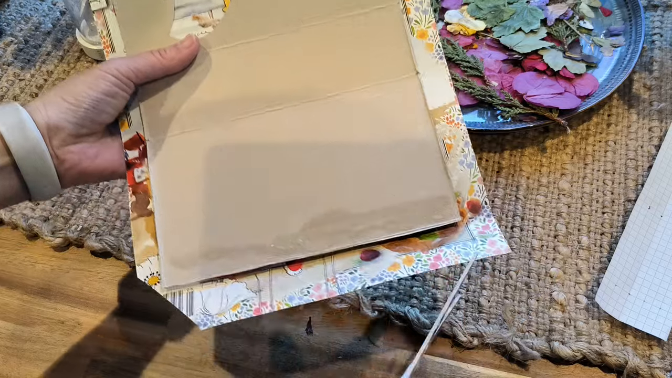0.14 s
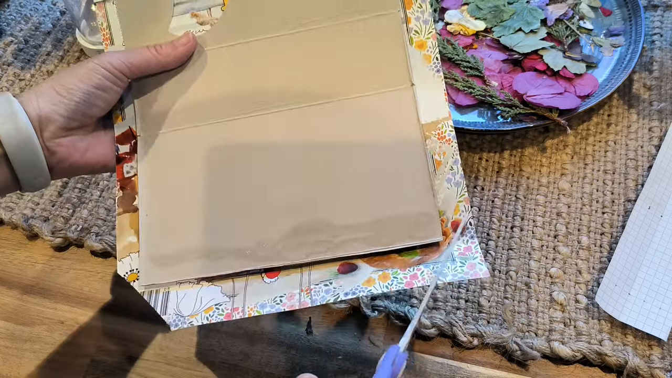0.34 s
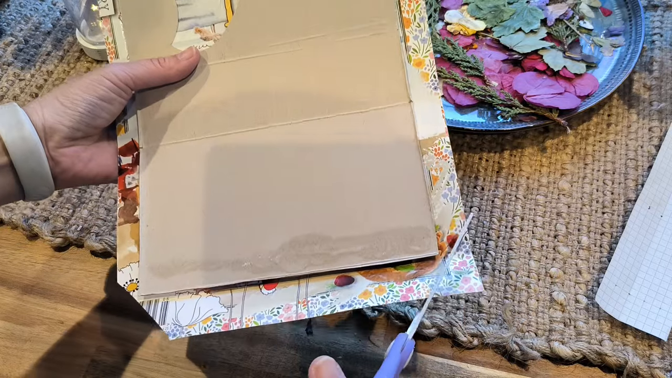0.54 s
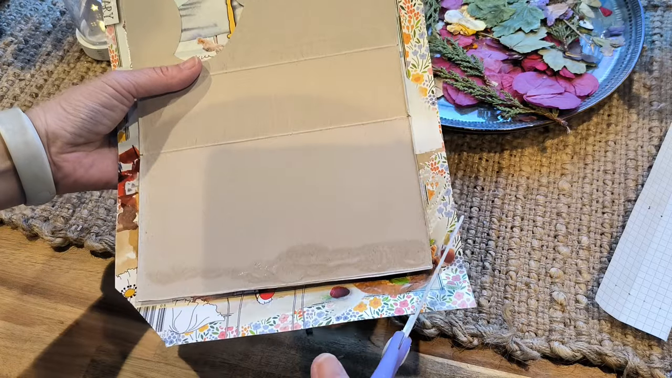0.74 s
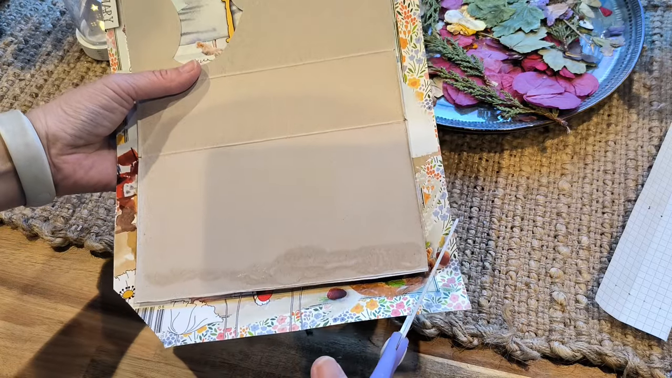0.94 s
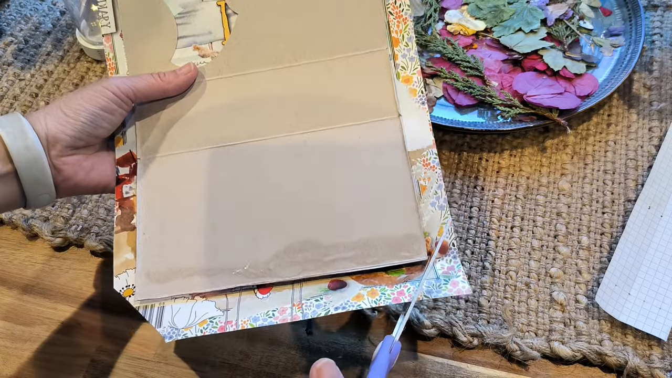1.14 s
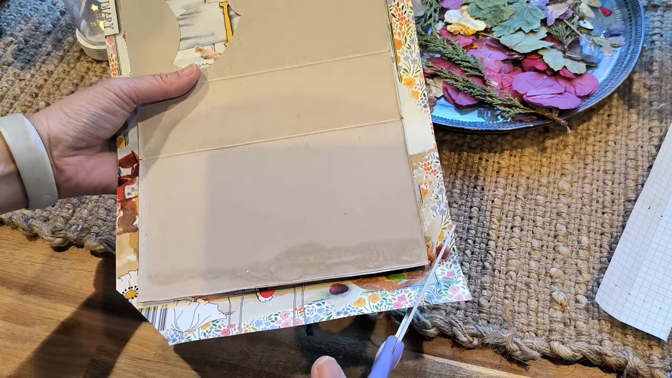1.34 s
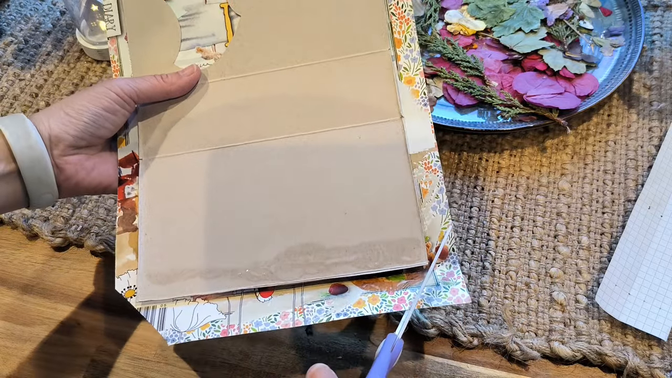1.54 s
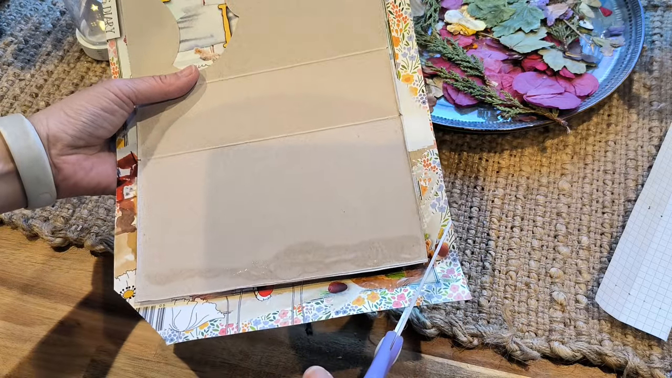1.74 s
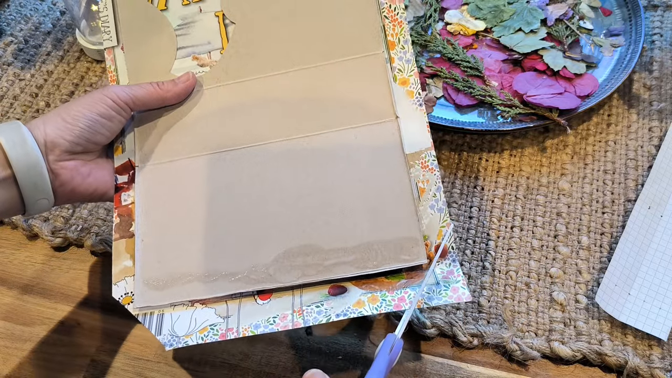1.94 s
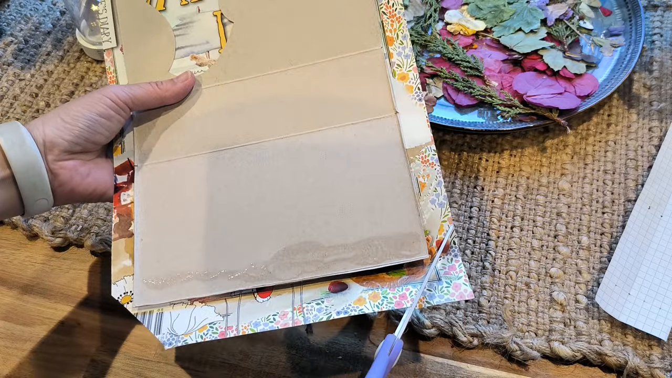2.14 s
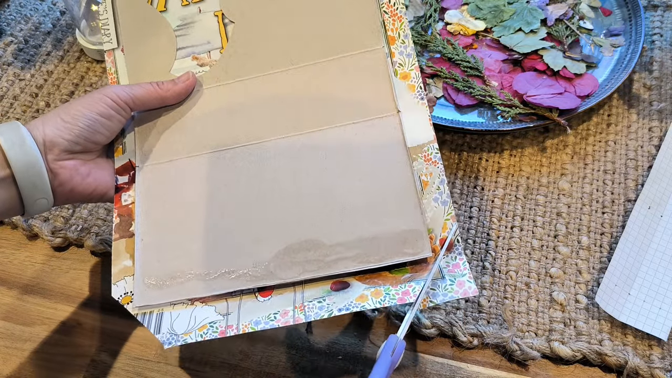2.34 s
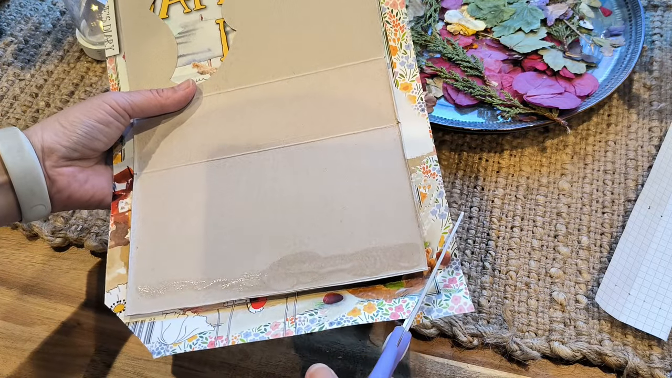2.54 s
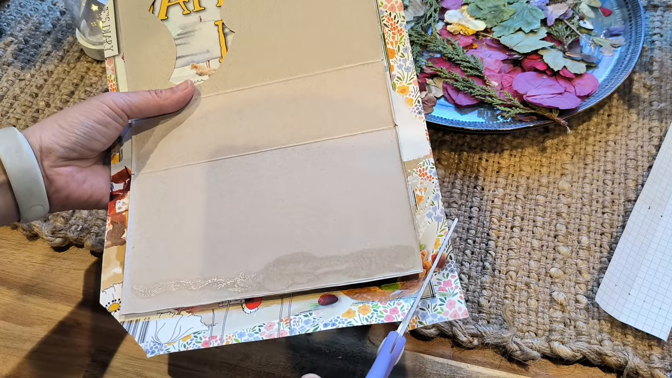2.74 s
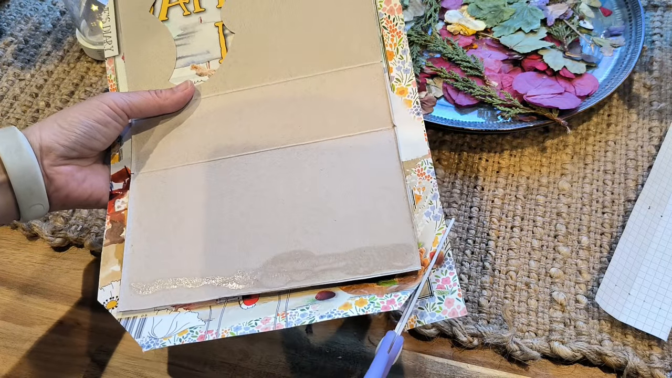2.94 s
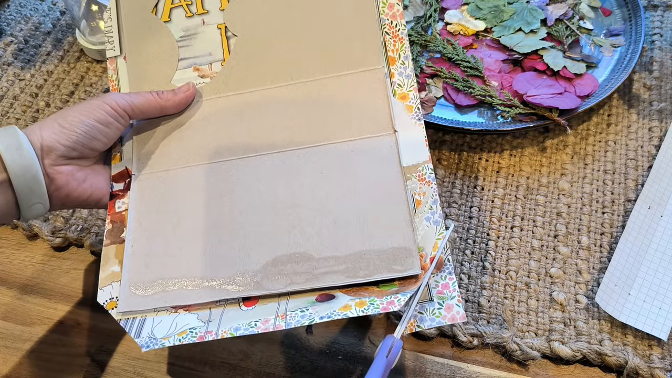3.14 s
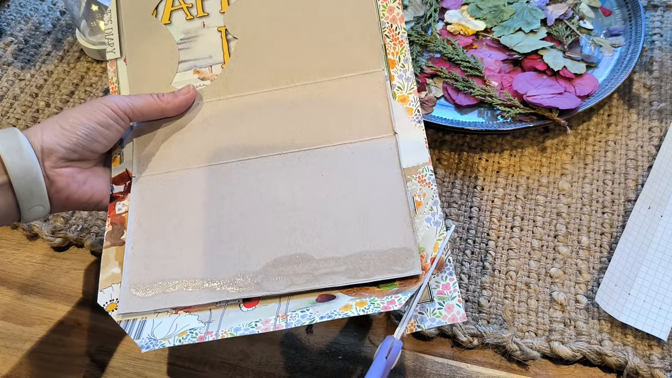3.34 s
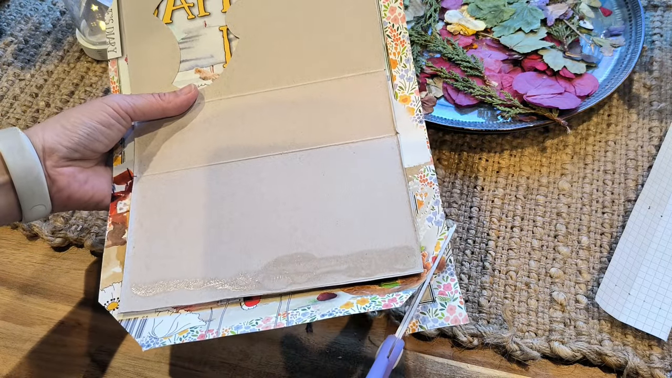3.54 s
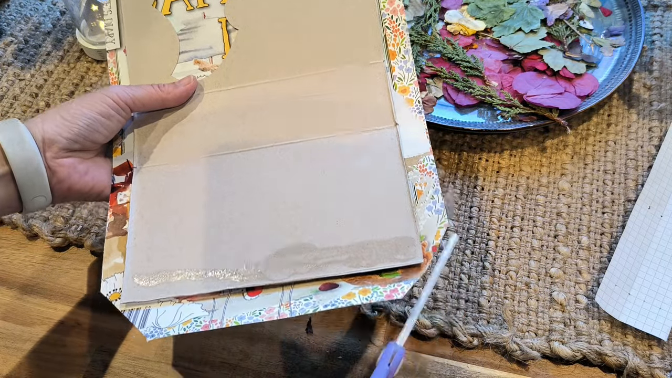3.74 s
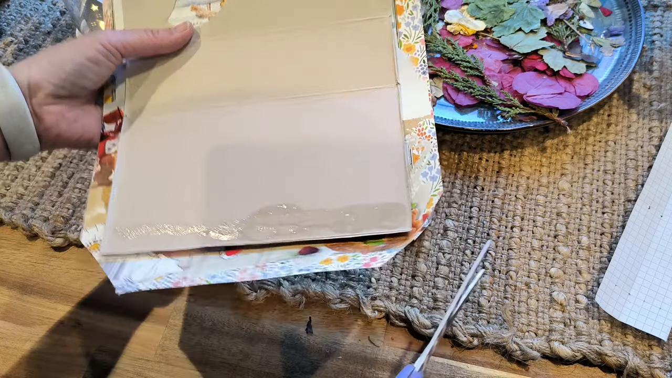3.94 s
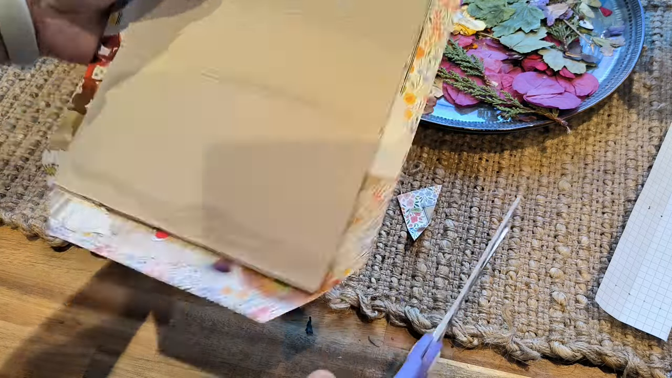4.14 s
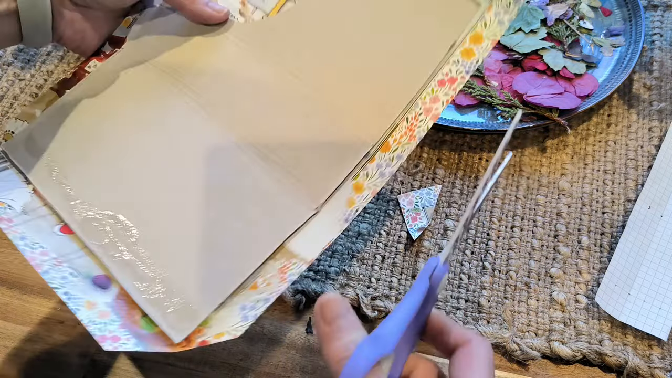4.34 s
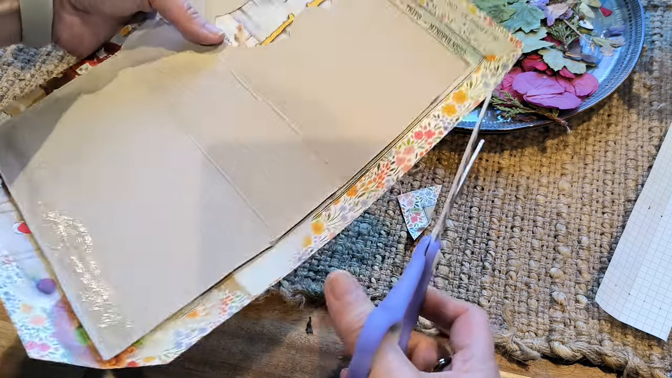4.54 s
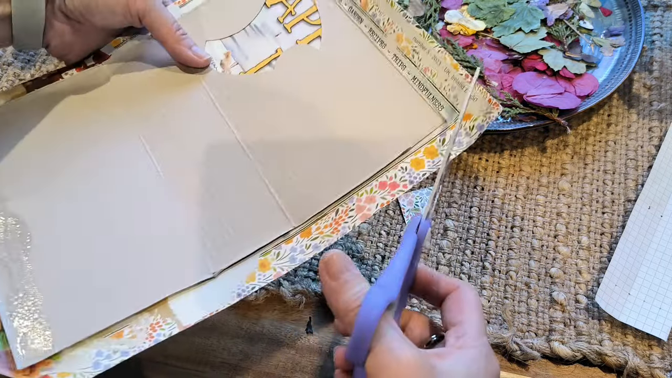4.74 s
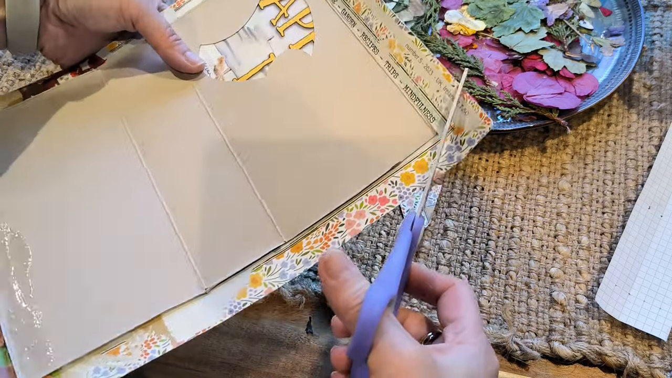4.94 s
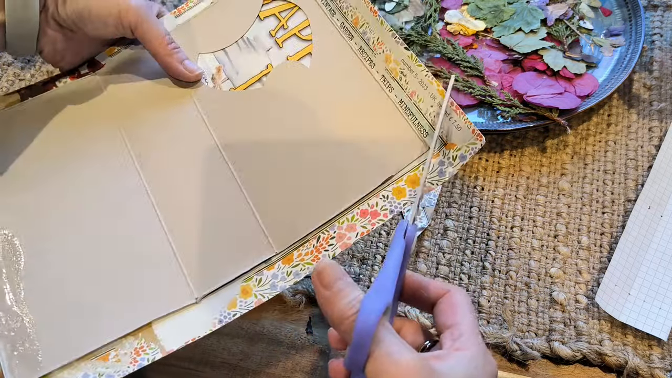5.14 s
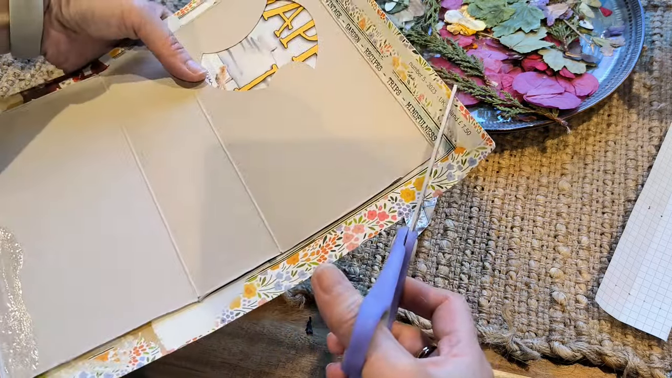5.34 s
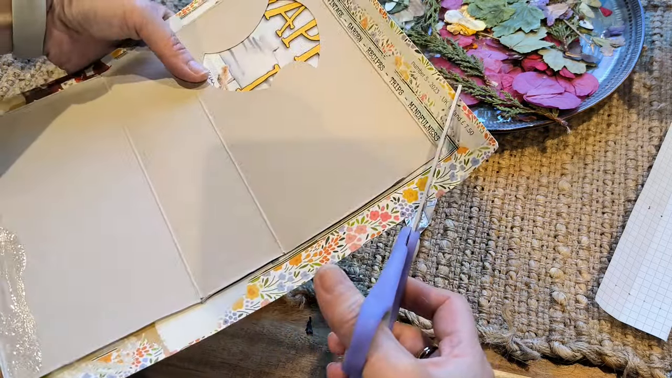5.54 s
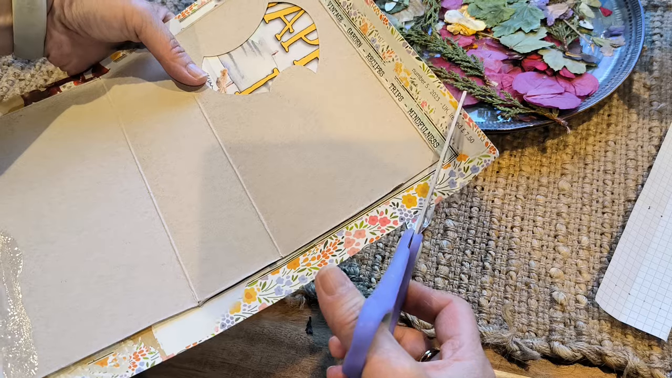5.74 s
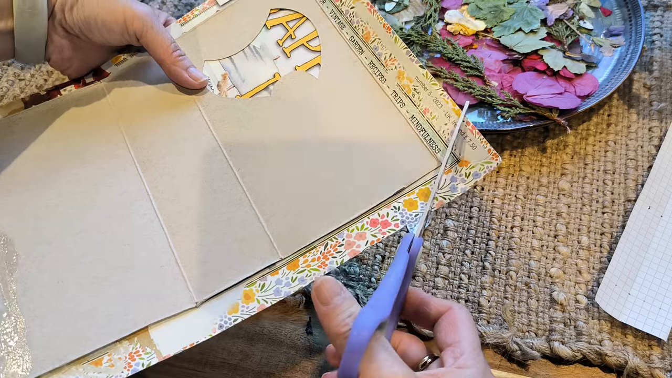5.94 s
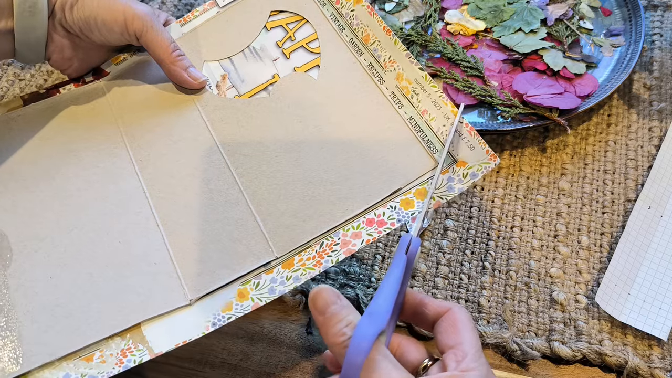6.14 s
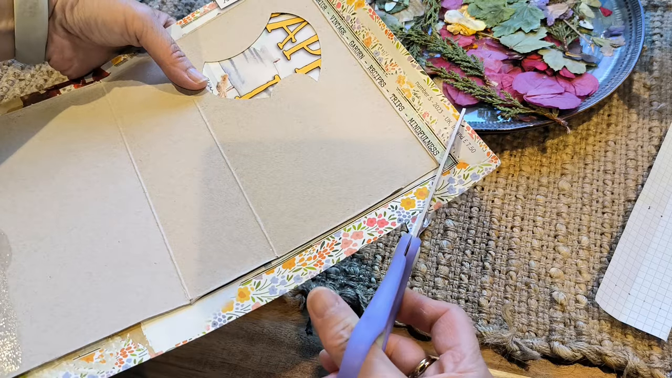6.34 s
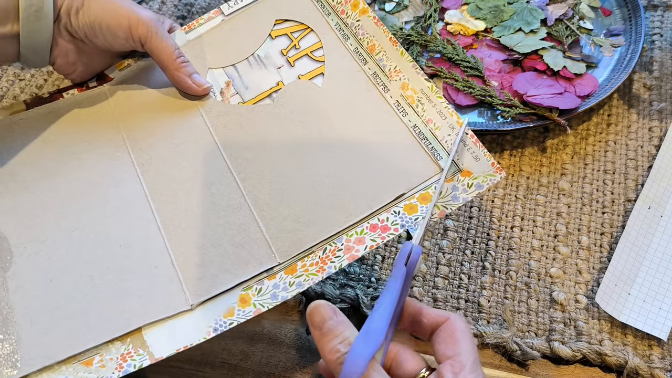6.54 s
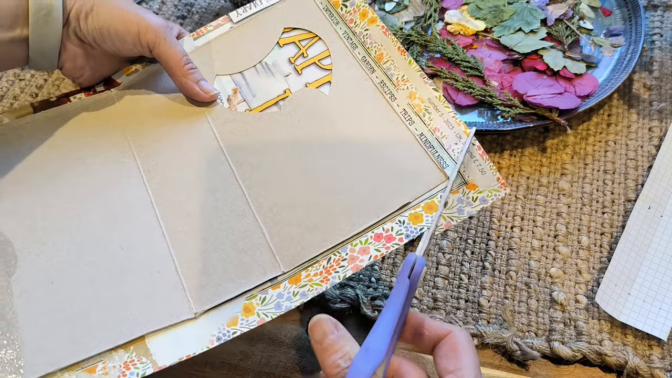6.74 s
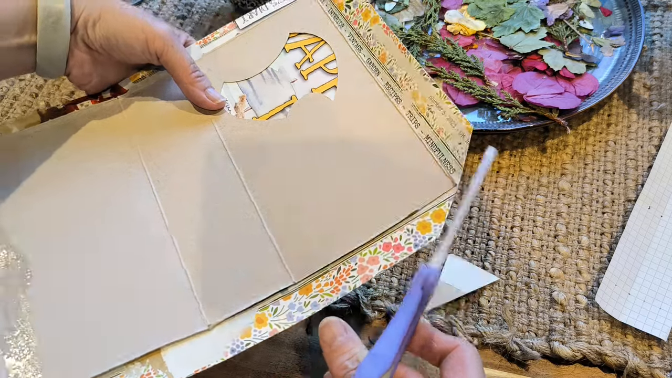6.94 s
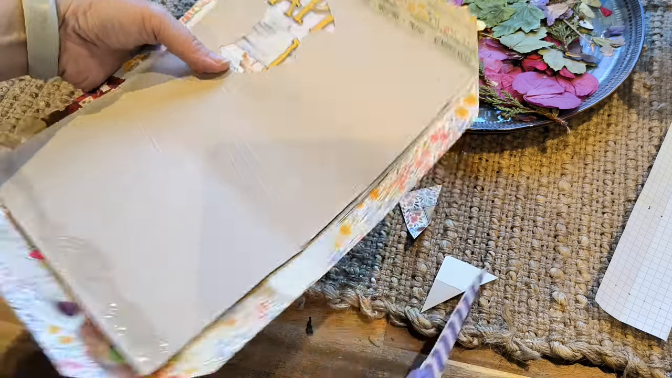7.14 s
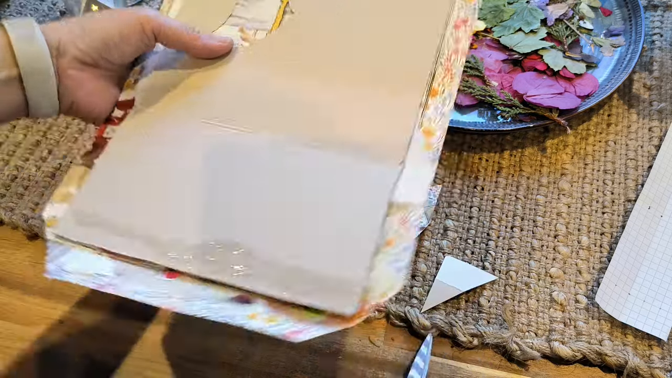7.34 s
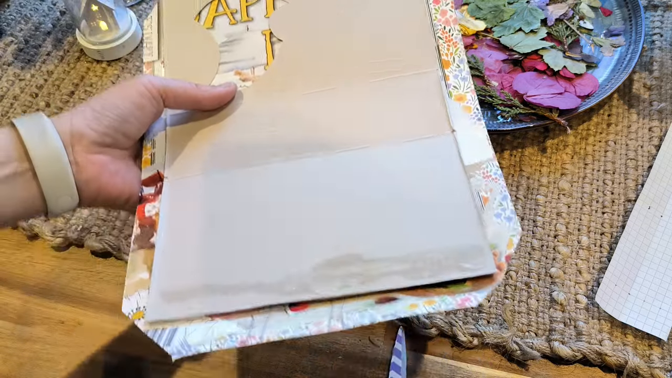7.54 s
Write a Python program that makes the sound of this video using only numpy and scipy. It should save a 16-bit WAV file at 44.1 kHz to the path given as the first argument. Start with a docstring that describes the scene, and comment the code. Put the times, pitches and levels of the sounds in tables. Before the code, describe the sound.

Close to the microphone in a small room, a sheet of covered cardboard bumps and slides softly under the hand. Scissors bite into it with short crackling crunches, growing harder until the blades snap shut brightly. After quiet handling, a second slower series of crunches ends in another sharp steel snap. Finally the scissors are put down with a hollow plastic clack and a woody table thud. Faint room rush and hiss lie beneath.

```python
"""Scissors cutting covered cardboard

Scissors trim two corners off a paper-covered sheet of cardboard, close to the microphone in a small room.
Each bite is a burst of noise with two decaying sheet modes; each cut ends in a click, chatter and ring of steel.
In between, the sheet slides (resonant rubbing noise) and bumps under the hand (damped modes and ticks).
At last the scissors are put down, which rings the modes of the table top.
Air, hiss and a narrow whistling band of noise lie beneath."""
import sys
import numpy as np
from scipy import signal
from scipy.fft import rfft, irfft, next_fast_len
from scipy.io import wavfile
from scipy.ndimage import map_coordinates

SR = 44100
rng = np.random.default_rng(int(sys.argv[2]) if len(sys.argv) > 2 else 0)


def master(y):
    """Save y as 16-bit WAV."""
    cut = np.clip(np.atleast_2d(y).T, -1, 1)
    pcm = np.round(cut * 32767)  # scale
    wavfile.write(sys.argv[1], SR, pcm.astype(np.int16))


N = 334278


def amp(db):
    """Level law: decibels to amplitude gain."""
    return 10 ** (np.asarray(db) / 20)


def unit(x):
    """Power normalisation: x at rms 1."""
    return x / np.sqrt(np.mean(x ** 2) + 1e-20)


def along(points, hz):
    """Interpolation of (frequency, value) points on a logarithmic frequency axis."""
    f, v = np.transpose(points)
    return np.interp(np.log(hz + 1), np.log(f + 1), v)


def filtered(x, response):
    """Linear filtering: the spectrum of x times a response of frequency."""
    m = next_fast_len(x.shape[-1] + SR // 4)
    spectrum = rfft(x, m) * response(np.fft.rfftfreq(m, 1 / SR))
    return irfft(spectrum, m)[..., :x.shape[-1]]


def causal(points, size=2048):
    """Minimum phase: the folded cepstrum of a spectrum gives its causal impulse response."""
    cepstrum = irfft(np.log(amp(along(points, np.fft.rfftfreq(size, 1 / SR)))))
    cepstrum[1:size // 2] *= 2
    cepstrum[size // 2 + 1:] = 0
    return irfft(np.exp(rfft(cepstrum)))


def coloured(x, points):
    """Spectral shaping of a stereo sound, keeping the power of white noise."""
    h = causal(points)
    return signal.oaconvolve(x, h[None] / np.linalg.norm(h), axes=1)[:, :N]


def resonance(f, hz, width):
    """Damped oscillator: the complex response of one mode, 1 at its centre."""
    return 1j * f * width / (hz * hz - f * f + 1j * f * width)


# likeness of left and right: frequency_hz, correlation
LIKENESS = [(60, 0.1), (300, 0.6), (640, 0.5), (1400, 0), (7000, 0.81), (15000, 0.06)]


def noise(size):
    """Partial coherence: white stereo noise whose left-right correlation depends on frequency."""
    def turn(hz):
        return np.arccos(np.clip(along(LIKENESS, hz), -1, 1)) / 2

    mid, side = filtered(rng.standard_normal((2, size)),
                         lambda hz: np.array([np.cos(turn(hz)), np.sin(turn(hz))]))
    return np.array([mid + side, mid - side])


def flat_noise(size):
    """Random phase: stereo noise with equal power at every frequency, so chance does not colour a short burst."""
    return unit(irfft(np.exp(2j * np.pi * rng.random((2, size // 2 + 1))), size))


def wobble(rate):
    """Random modulation: a curve drawn straight between random knots, rate knots a second."""
    knots = rng.standard_normal(int(N * rate / SR) + 4)
    return map_coordinates(knots, [np.arange(N) * rate / SR], order=1)


def add(track, s, sound):
    """Superposition: mix a sound into the track from time s."""
    part = track[:, round(s * SR):][:, :sound.shape[-1]]
    part += sound[..., :part.shape[1]]


def swell(t, length):
    """Gaussian envelope: a burst whose power stays above half for the given length."""
    return np.exp(-2 * np.log(2) * (t / length) ** 2)


def stroke(s, db, rise, hold, fade):
    """Envelope of a rubbing movement: it speeds up, holds and slows; rise and fade each span 20 dB."""
    t = np.arange(N) / SR - s
    before = np.maximum(-t, 0) / rise
    after = np.maximum(t - hold, 0) / fade
    return amp(db - 20 * (before + after).clip(0, 10))


# spectrum of the room's air: frequency_hz, relative_level_db
AIR_SPECTRUM = [(15, -89), (25, -62.5), (59, -20), (124, -7), (229, -9), (252, -5.5), (283, -1), (318, -10),
                (357, -2.5), (425, -5), (459, -5.5), (834, -20.5), (918, -21), (2500, -30), (3250, -62.5),
                (5500, -120)]


def background(level_db=-65.5, drift_db=1.23):
    """Stationary filtered noise: the low rush of the room's air, drifting slightly in level."""
    air = unit(filtered(noise(N), lambda hz: amp(along(AIR_SPECTRUM, hz))))
    return air * amp(level_db + drift_db * wobble(6.6)) * amp([[.5], [-.5]])


# reverberation time of the room: frequency_hz, t60_s
ROOM_DECAY = [(150, 0.62), (600, 0.75), (2500, .55), (6500, 0.61), (10000, .42), (15000, 0.36)]
# colour of the reverberation: frequency_hz, relative_level_db
ROOM_SPECTRUM = [(100, 0.5), (500, 1.5), (1200, 1.5), (2500, -2.5), (6500, -2.5), (9000, -2.5),
                 (15000, -5.5)]


def room(x, gap_s=0.0048, build_s=0.001):
    """Diffuse reverberation: the walls answer after a short gap and each frequency dies at its own speed."""
    hz, t, z = signal.stft(noise(SR * 3 // 4), SR, nperseg=256)
    decay = amp(-60 * t / along(ROOM_DECAY, hz)[:, None])
    tail = signal.istft(z * decay, SR, nperseg=256)[1]
    since_gap = np.maximum(np.arange(tail.shape[1]) / SR - gap_s, 0)
    tail = tail * (1 - np.exp(-since_gap / build_s))
    tail = filtered(tail / np.linalg.norm(tail[0]), lambda f: amp(along(ROOM_SPECTRUM, f)))
    return signal.oaconvolve(x, tail, axes=1)[:, :N]


# spectrum of a contact tick: frequency_hz, relative_level_db
TICK_SPECTRUM = [(100, -1.5), (600, 2), (1500, 1), (2600, -0.5), (4000, -2.5), (6000, -1), (9000, -4.5),
                 (16000, -6.5)]


def knocks(contacts, modes, tick_t60, tick_rise, tick_gain_db, thud_rise=0.0021, thud_cut_hz=125):
    """Modal impact: a contact ticks and rings the modes at new strengths."""
    thuds, ticks = np.zeros((2, 2, N))
    t = np.arange(SR // 3) / SR
    for s, thud_db, tick_db in contacts:
        ring = 0
        for hz, db, t60 in modes:
            size_db, phase, apart = rng.standard_normal(3)
            angle = 2 * np.pi * hz * t + 2 * phase + 0.2 * apart * np.array([[1], [-1]])
            ring = ring + amp(db + size_db - 60 * t / t60) * np.sin(angle)
        add(thuds, s, amp(thud_db) * ring * (1 - np.exp(-t / thud_rise)))
        tick_decay = amp(tick_db + tick_gain_db - 60 * t / tick_t60)
        add(ticks, s, tick_decay * (1 - np.exp(-t / tick_rise)))
    # a second-order low cut keeps the thuds free of deep bass
    thuds = filtered(thuds, lambda f: 1j * f / thud_cut_hz * resonance(f, thud_cut_hz, thud_cut_hz))
    return (thuds + coloured(ticks * noise(N), TICK_SPECTRUM)) * amp([[1.5], [-1]])


# the sheet bumps under the hand: start_s, relative_thud_db, relative_tick_db
SHEET_BUMPS = [(.505, -53.5, -62.5), (.552, -55.5, -72), (.650, -56, -58), (.707, -50.5, -56),
               (.729, -48.5, -56), (.817, -53, -75), (1.329, -68, -57), (1.585, -50, -61),
               (1.603, -47, -70), (2.478, -45, -41), (2.483, -35, -51.5), (2.517, -43, -64),
               (2.600, -58, -44.5), (2.607, -47, -45), (2.615, -46, -50), (3.933, -70, -59),
               (4.264, -56, -56.5), (4.933, -57, -56.5), (6.184, -49, -57.5)]
# modes of the sheet: frequency_hz, relative_level_db, t60_s
SHEET_MODES = [(144, -16, 0.06), (240, -11, 0.099), (383, 2.5, 0.034), (500, -4, 0.018), (680, 0, 0.026),
               (930, -12, 0.037), (1380, -16.5, 0.02)]


def sheet_bumps():
    """Plate modes struck by contact: the sheet thuds and ticks under the hand."""
    return knocks(SHEET_BUMPS, SHEET_MODES, tick_t60=0.01, tick_rise=.0015, tick_gain_db=11)


# the sheet slides against hand and blades:
# full_speed_s, relative_level_db, rise_s, hold_s, fade_s, resonance_hz, resonance_db, treble_db
SHEET_SLIDES = [(0.226, -60, .012, .004, 0.054, 6960, 1.5, 17),
                (0.51, -59, .012, .095, .02, 3100, 8.5, -8.5),
                (0.727, -60, 0.017, 0.019, 0.033, 2080, 7.5, -2),
                (0.797, -68, 0.024, .02, 0.027, 2100, 6, 0), (1.123, -62, 0.016, .03, .11, 2050, 12, 2.5),
                (1.588, -53, 0.014, .004, 0.025, 2000, 1, 2.5),
                (2.408, -63.5, 0.084, 0.049, .03, 1290, 10, 4.5),
                (2.496, -61, .02, .06, 0.19, 1760, 8.5, -7.5), (4.262, -64.5, .025, .004, .04, 2220, 6, 9),
                (4.935, -69, 0.014, .1, .07, 3300, 3.5, -7),
                (5.197, -62.5, .04, 0.028, 0.081, 3350, 6.5, -10),
                (5.629, -60, 0.042, .008, .025, 2240, 4, 0), (5.88, -68.5, 0.035, .42, .02, 5050, 5, 4),
                (7.407, -62, 0.1, .008, .012, 2400, 4.5, 7)]
# spectrum of rubbing paper: frequency_hz, relative_level_db
RUB_SPECTRUM = [(100, -10), (300, 3.5), (520, 15), (1000, -2), (2000, -2.5), (2600, -7), (4500, -5),
                (7000, -4.5), (11000, -11.5), (16000, -16.5)]


def slides(catch_db=4.0, grain_db=4, overtone=2.45):
    """Friction noise: paper rubs in tiny catches; each grip frees a part of the sheet to ring in two broad modes."""
    track = np.zeros((2, N))
    roughness_db = catch_db * wobble(110) + grain_db * wobble(1500)
    grains = coloured(unit(noise(N) * amp(roughness_db)), RUB_SPECTRUM)
    for s, db, rise, hold, fade, hz, peak_db, treble_db in SHEET_SLIDES:
        start = max(s - 2 * rise, 0)
        at = slice(round(start * SR), round((s + hold + 2 * fade) * SR))

        def colour(f):
            modes = resonance(f, hz, hz / 5) + resonance(f, overtone * hz, hz / 2) / 2
            treble = amp(treble_db * f ** 2 / (f ** 2 + 7000 ** 2))
            return (1 + (amp(peak_db) - 1) * modes) * treble

        rub = grains[:, at] * stroke(s, db, rise, hold, fade)[at]
        add(track, start, filtered(rub, colour))
    return track * amp([[1.5], [-1]])


# the blades slide open against each other: full_speed_s, level_db, rise_s, hold_s, fade_s
OPENING_STROKE = (2.5, -64, 0.4, 0.07, 0.05)
# bands in which the blades rasp: frequency_hz, width_hz, relative_level_db
BLADE_BANDS = [(5900, 450, 5), (7540, 300, -2), (10100, 1300, -4.5)]


def opening(catch_db=6.0):
    """Steel friction: the opening blades rasp faintly in a few narrow bands, each catching and letting go."""
    rasp = np.zeros((2, N))
    for hz, width, db in BLADE_BANDS:
        band = filtered(rng.standard_normal((2, N)), lambda f: resonance(f, hz, width) ** 2)
        rasp += amp(db + catch_db * wobble(70)) * band
    return unit(rasp) * stroke(*OPENING_STROKE)


# the scissors land on the table and bounce: start_s, relative_thud_db, relative_tick_db
LANDINGS = [(7.4146, -38.5, -26.5), (7.428, -44.5, -36.5)]
# modes of the table top with the scissors on it: frequency_hz, relative_level_db, t60_s
TABLE_MODES = [(120, -9.5, 0.23), (155, -17, 0.085), (192.4, -8.5, 0.2), (240, -5, .12), (287, 1.5, 0.081),
               (369, -4, 0.13), (542, -16.5, 0.34), (712.5, -6.5, 0.35), (893, -11, 0.28),
               (1450, -14.5, 0.15), (1587, -15, 0.19), (2680, -23, .2), (3300, -16, .1), (6800, -23, .15)]
# the hollow plastic handles clack: frequency_hz, width_hz, boost_db
HANDLE_MODE = (2560, 300, 8.8)


def put_down():
    """Modal impact and resonance: the table top thuds and the hollow handles clack."""
    hz, width, db = HANDLE_MODE
    contact = knocks(LANDINGS, TABLE_MODES, tick_t60=.011, tick_rise=0.00099, tick_gain_db=7.5)
    return filtered(contact, lambda f: 1 + (amp(db) - 1) * resonance(f, hz, width))


# bites of the blades: centre_s, level_db
BLADE_BITES = [(2.023, -62), (2.0595, -53.5), (2.0897, -59), (2.1144, -55), (2.1379, -54.5), (2.163, -52.5),
               (2.1874, -48), (2.2128, -44.5), (2.252, -56), (2.784, -52.5), (2.8232, -46.5), (2.8491, -58),
               (2.8618, -54), (2.8911, -48), (2.9444, -52), (3.0113, -57.5), (3.1204, -45.5), (3.154, -55),
               (3.1722, -54.5), (3.4065, -56), (3.4938, -52.5), (3.5027, -53), (3.5222, -54),
               (3.5544, -49.5), (3.5743, -49), (3.5955, -39.5), (3.6094, -44), (3.6255, -34.5),
               (6.146, -60), (6.1865, -56.5), (6.246, -57), (6.272, -57), (6.32, -61), (6.348, -48.5),
               (6.403, -49), (6.4554, -50), (6.5229, -43), (6.5703, -43), (6.626, -42), (6.673, -57),
               (6.7171, -47.5), (6.766, -40.5), (6.808, -42), (6.8265, -38)]
# squeezes of the hand, each on a different part of the sheet, shared by its bites:
# start_s, usual_bite_length_s, treble_db, usual_flex_hz, relative_flex_db, relative_upper_mode_db
HAND_SQUEEZES = [(1.9, .005, 4.5, 500, -54, -69), (2.1, .0095, 2.5, 483.3, -60.5, -62),
                 (2.7, 0.0046, 2.5, 479.2, -62, -67.5), (3.07, 0.0042, 1, 861, -55.5, -55),
                 (3.3, 0.004, 0, 500, -66, -59.5), (6.0, .006, -6.5, 543, -54.5, -70.5),
                 (6.335, 0.0054, -.5, 572, -49.5, -72), (6.6, 0.0053, -1.5, 558.6, -54, -66.5)]
# spectrum of breaking fibres: frequency_hz, relative_level_db
FIBRE_SPECTRUM = [(120, -10), (400, 3.5), (900, 3), (1600, -6.5), (2100, 0.5), (2650, -3), (3200, -2.5),
                  (4000, -1), (5000, 2.5), (7000, -1), (11000, -2), (16000, -4)]
# a bite of USUAL_DB has the usual length and flex; a harder one is over sooner and bends the sheet further
USUAL_DB = -48.5
HALF_LENGTH_DB, FLEX_GROWS = 46, 1  # dB more that halve the length, dB of flex per dB of bite
UPPER_HZ = 1480  # the sheet's upper mode, before each bite's own detuning


def bites(flex_db=3, flex_t60=.022, lead=.1, treble_hz=8000, flex_rough=.09, detune=.06, scatter_db=2):
    """Fracture noise and flexure: fibres break in milliseconds and jolt the sheet, which rings in two modes."""
    force, bright, flex = np.zeros((3, 2, N))
    t = np.arange(-SR // 40, SR // 15) / SR
    decay = amp(-60 * (t - t[0]) / flex_t60)
    for s, db in BLADE_BITES:
        squeeze = [row for row in HAND_SQUEEZES if row[0] <= s][-1]
        _, usual_length, treble_db, flex_hz, sheet_db, upper_db = squeeze
        harder = db - USUAL_DB
        # each bite's colour varies at random: duller with more flex, or brighter with less
        colour_db = scatter_db * rng.standard_normal()
        length = usual_length * 2 ** (-harder / HALF_LENGTH_DB)
        # fibres give way faster than they settle
        burst = amp(db) * swell(t, length * (1 + lead * np.sign(t)))
        add(force, s + t[0], burst)
        add(bright, s + t[0], burst * amp(treble_db - colour_db))
        ring = signal.fftconvolve(swell(t + length / 2, length / 2), decay)[:len(t)]
        ring = ring / ring.max()
        modes = ((flex_hz, sheet_db + FLEX_GROWS * harder + colour_db), (UPPER_HZ, upper_db + harder))
        for hz, mode_db in modes:
            drift = flex_rough * np.cumsum(rng.standard_normal(len(t)))  # the moving cut keeps detuning the sheet
            phase = 2 * np.pi * rng.random() + .5 * rng.standard_normal((2, 1)) + drift
            pitch = hz * np.exp(detune * rng.standard_normal())
            add(flex, s + t[0], amp(mode_db + flex_db) * ring * np.sin(2 * np.pi * pitch * t + phase))
    fibres = unit(noise(N) * amp(3.5 * wobble(2000)))
    # only the treble follows the bright envelope
    treble = filtered((bright - force) * fibres, lambda f: 1 - 1 / (1 + (f / treble_hz) ** 10))
    return coloured(force * fibres + treble, FIBRE_SPECTRUM) + flex * amp([[2], [-2]])


# the blades snap shut: start_s, level_db, ring_hz, ring_relative_db, thump_relative_db
BLADE_SNAPS = [(3.630, -16.5, 6553, -6.5, -19.5), (6.830, -16.5, 6320, -8.5, -13.5)]
# spectrum of struck steel: frequency_hz, relative_level_db
STEEL_SPECTRUM = [(60, -24), (400, -12.5), (1000, -16.5), (1700, -9), (3800, -8), (5500, -2), (8000, 3),
                  (10300, 6), (13000, -0.5), (16000, -1.5)]
# spectrum of the jolt that a snap gives the sheet: frequency_hz, relative_level_db
THUMP_SPECTRUM = [(30, -19.5), (80, -13.5), (150, -13.5), (300, -3), (380, 5.5), (560, 1.5), (800, -9),
                  (1300, -36), (4000, -46.5)]


def snaps(click_db=14, rattle_s=0.0017, rattle_delay=.0011, ring_t60=0.022, spread_db=19.0, size=256):
    """Impact of steel: a click, a brief chatter and a ring that the hand damps at once.

    Returns the direct sound and the sharper version that spreads into the room."""
    strikes, rings, thumps, pulses = np.zeros((4, 2, N))
    t = np.arange(-size, SR // 20) / SR
    after, click = np.maximum(t, 0), t == 0
    for s, db, hz, ring_db, thump_db in BLADE_SNAPS:
        repeated = flat_noise(size)[:, np.arange(len(t)) % size]
        chatter = repeated * swell(t - rattle_delay, rattle_s)
        add(strikes, s + t[0], amp(db) * (chatter - amp(click_db) * click))
        ring = np.sin(2 * np.pi * hz * after) * amp(-60 * after / ring_t60)
        ring = ring * (1 - np.exp(-after / 0.00038))
        add(rings, s + t[0], amp(db + ring_db) * ring * amp([[-4], [5]]))
        add(thumps, s + t[0], amp(db + thump_db + 15.5) * click)
        add(pulses, s + t[0], amp(db + spread_db) * click)
    thump = coloured(thumps, THUMP_SPECTRUM)
    direct = coloured(strikes, STEEL_SPECTRUM) * amp([[-1], [1.5]]) + rings + thump
    spread = coloured(pulses, STEEL_SPECTRUM) + amp(-3.0) * rings + thump
    return direct, spread


def scene():
    """Direct and reverberant fields added: the direct sound reaches the left port a little earlier."""
    steel, spread = snaps()
    sheet = bites() + slides() + opening() + sheet_bumps()
    drop = put_down()
    walls = room(amp(-5.0) * spread + amp(-8.0) * sheet + amp(-6) * drop)
    # left one sample early, right one sample late
    shift = np.array([[1], [-1]]) / SR
    direct = filtered(steel + sheet + drop, lambda f: np.exp(2j * np.pi * f * shift))
    return direct + walls + background()


# broad colour of the left and right microphone ports: frequency_hz, gain_db
LEFT_COLOUR = [(1000, 3), (4000, 3.5), (7400, 0), (9400, 3), (10800, 4), (12200, 4.5), (13500, 1),
               (15500, -6)]
RIGHT_COLOUR = [(1000, 2.5), (4000, 2.5), (5500, 5), (7300, 6), (8100, -11), (9000, -11.5), (10700, -1.5),
                (12000, -1), (15500, -4)]
# resonance of the left and the right port: frequency_hz, width_hz, boost_db
PORT_RESONANCES = [(8400, 400, 9), (6650, 650, 7)]
# spectrum of the microphone hiss: frequency_hz, relative_level_db
HISS_SPECTRUM = [(100, -13), (1500, -3.5), (3500, 3), (6000, 0.5), (7500, -4.5), (10000, -5), (10600, -1),
                 (13000, -3), (15600, -1.5), (16000, -15), (16500, -39)]
# spectrum of the whistling band: frequency_hz, relative_level_db
WHISTLE_SPECTRUM = [(7900, -47), (8200, -19), (8300, -2.5), (8520, -1.5), (8700, -8.5), (9100, -54)]
TOP_HZ = 16000  # nothing is heard from here up


def record(dry, hiss_db=-73, whistle_db=-76, low_cut_hz=56):
    """Port resonance and band noise: the microphones colour the sound and add hiss;
    a narrow band of noise near 8.4 kHz whistles, mostly left."""
    heard = []
    for side, port, (hz, width, db) in zip(dry, (LEFT_COLOUR, RIGHT_COLOUR), PORT_RESONANCES):
        shaped = signal.oaconvolve(side, causal(port))[:N]
        heard.append(filtered(shaped, lambda f: 1 + (amp(db) - 1) * resonance(f, hz, width)))
    hiss = amp(hiss_db) * coloured(rng.standard_normal((2, N)), HISS_SPECTRUM)
    whistle = amp(whistle_db) * coloured(rng.standard_normal((2, N)), WHISTLE_SPECTRUM) * amp([[0], [-17]])
    low_cut = signal.butter(4, low_cut_hz, "highpass", fs=SR, output="sos")
    return filtered(signal.sosfilt(low_cut, np.array(heard) + hiss + whistle), lambda hz: hz < TOP_HZ)


dry = scene()
out = record(dry)
master(out)
```